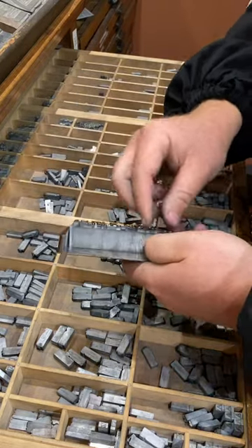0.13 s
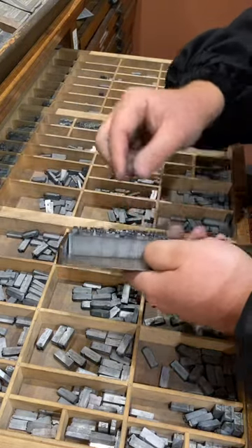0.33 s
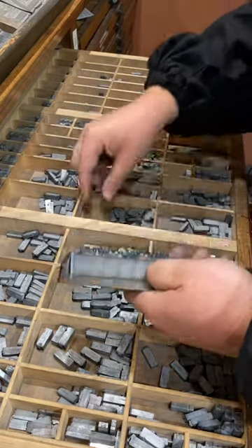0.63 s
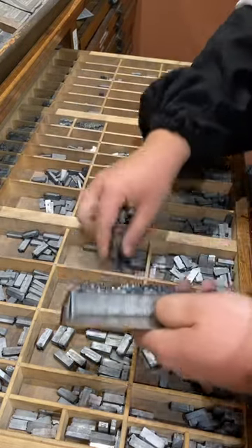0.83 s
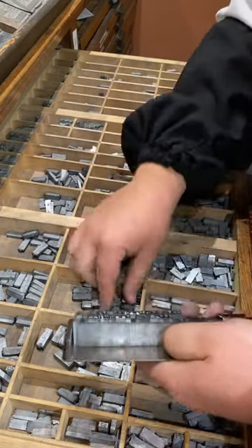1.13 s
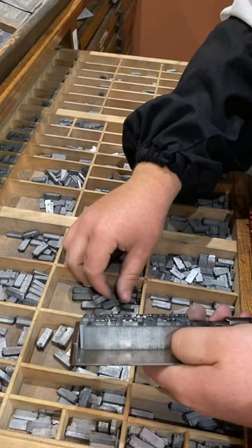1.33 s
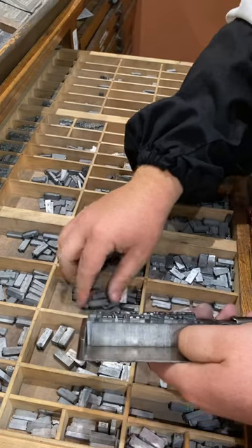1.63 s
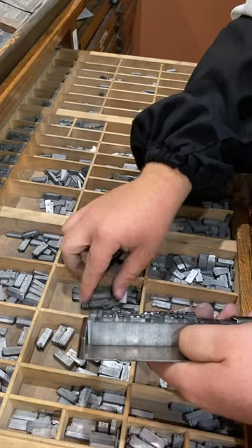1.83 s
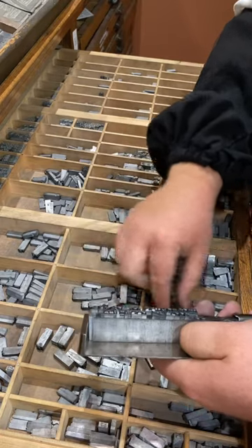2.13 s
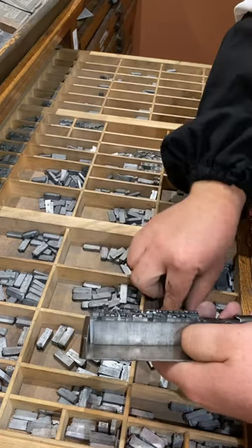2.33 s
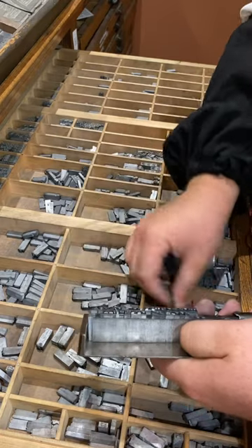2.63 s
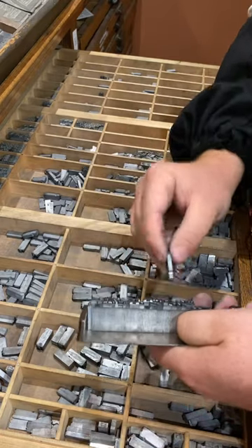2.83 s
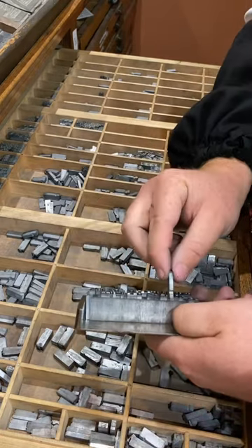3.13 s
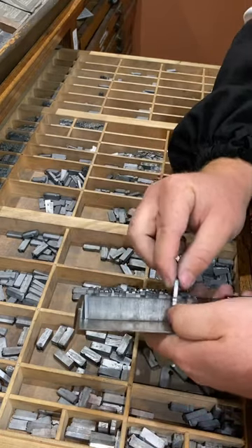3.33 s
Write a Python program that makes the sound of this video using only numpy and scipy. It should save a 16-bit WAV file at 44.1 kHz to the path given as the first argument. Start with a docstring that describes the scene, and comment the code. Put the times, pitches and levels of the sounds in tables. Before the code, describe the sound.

Small metal type pieces click against a hand-held metal holder, then knock and rattle as fingers rummage in a wooden case. One piece scrapes over wood and clicks into the holder, close up in a quiet, humming room.

```python
"""Hand typesetting, close up, in a quiet room with ventilation rumble and mains hum throughout.
First, small lead sorts click against a hand-held metal composing stick and a thumb slides along it.
From 1 s, fingers rummage in a wooden type case: pieces knock and rattle, and the tray drums softly.
Around 2.5 s a sort scrapes over the wood, and just after 3 s it clicks home in the stick.
A faint, dull room tail follows each click."""
import sys
import numpy as np
from scipy import signal
from scipy.fft import rfft, irfft, next_fast_len
from scipy.io import wavfile

SR = 44100
rng = np.random.default_rng(int(sys.argv[2]) if len(sys.argv) > 2 else 0)


def store_pcm(level_fs):
    """Save levels as 16-bit WAV."""
    pcm = np.round(np.clip(level_fs, -1, 1) * 32767).astype(np.int16)
    wavfile.write(sys.argv[1], SR, np.atleast_2d(pcm).T)


N = 153468

# Ventilation, deep rumble under faint hiss. Each row: frequency in Hz, gain in dB.
VENTILATION_EQ = [(8.8, -34), (15, 9), (29, -5), (60, -14.5), (76, -23.5), (124, -14.5), (147, -24.5),
                  (278, -23), (643, -35), (787, -38.5), (1250, -44.5), (1670, -46), (5150, -58),
                  (7080, -57.5), (15000, -64.5)]

# The tray drumming under the fingers. Each row: middle and half length in seconds, level in dB.
TRAY_SWELLS = [(1.39, 0.099, -44), (1.67, 0.021, -44)]
# Pieces shifting in the case. Each row: middle and half length in seconds, level in dB.
RATTLE_SWELLS = [(1.048, 0.0024, -25), (1.095, 0.065, -53.5), (1.25, 0.036, -38.5), (1.33, 0.1, -43),
                 (1.445, 0.014, -38)]
# A sort dragged over the wood. Each row: middle and half length in seconds, level in dB, pitch in Hz.
SCRAPE_STROKES = [(2.348, 0.052, -54, 4450), (2.452, 0.035, -46.5, 1650), (2.536, 0.015, -46.5, 2070),
                  (2.568, 0.023, -44.5, 5200), (2.613, 0.015, -28.5, 1660), (2.644, 0.011, -40.5, 1890)]
# The tone of lead scraping wood. Each row: frequency in Hz, gain in dB.
SCRAPE_EQ = [(300, -16), (700, -23), (1100, 2.5), (1400, -3.5), (1690, 5.5), (1900, -2), (2200, 0.5),
             (3000, -5), (5200, -9), (6000, -14), (9000, -23.5), (15000, -35)]
# Sorts knocking in the case. Each row: start in seconds, level in dB, treble in dB, pitch in Hz.
KNOCKS = [(1.0435, -28.5, 8, 7000), (1.0511, -12.5, 3, 1850), (1.0523, -10, 11, 3760),
          (1.071, -33, -8, 2900), (1.1194, -16.5, 6, 5440), (1.1736, -22.5, 0, 1750),
          (1.2348, -26.5, 11, 3670), (1.2455, -22.5, -7, 4040), (1.2541, -30, -1, 4600),
          (1.265, -19.5, -4, 4100), (1.2713, -29.5, -1, 2500), (1.2765, -30, -10, 3910),
          (1.286, -15, 3.5, 2970), (1.2907, -35, -2, 2600), (1.302, -29.5, -10, 2220),
          (1.3193, -26, 6, 2040), (1.3354, -25, -14, 3800), (1.3461, -24, -2, 3680),
          (1.379, -22.5, -14, 1950), (1.4174, -13.5, 1.5, 2010), (1.4232, -12.5, 3, 2070),
          (1.4257, -19.5, 4, 2020), (1.436, -25, -1, 2150), (1.4451, -27, -10.5, 2180),
          (1.4742, -24.5, 0.5, 3660), (1.538, -36, -9, 3730), (1.5853, -34.5, 2, 4500),
          (1.624, -41.5, -4.5, 3680), (1.6631, -29.5, -2.5, 2730), (1.9112, -43.5, -0.5, 2858),
          (1.9272, -42, -0.5, 2370), (2.3169, -40.5, -4, 1650), (2.5627, -30, -12, 1750),
          (2.594, -30, -21, 1650), (2.608, -32, -6, 1650), (2.619, -32, -5, 1720)]
# The ring of the loaded case. Each row: frequency in Hz, resonance height in dB, T60 in seconds.
CASE_RESONANCES = [(382, -8, 0.1), (449, -4, .08), (888, 3, 0.031), (1090, 0.5, 0.035), (1261, 0, 0.039),
                   (1660, -7.5, 0.064), (2040, -4, 0.034), (2203, 3.5, 0.026), (2950, -5.5, 0.02),
                   (3570, -7, 0.02), (3836, -4, 0.012), (4930, -8, 0.018), (6260, -14, 0.0089),
                   (7050, -19, 0.016)]
# The woody attack of a knock. Each row: frequency in Hz, gain in dB.
CASE_CRACK_EQ = [(150, -29.5), (600, -12), (900, 6.5), (1500, 4.5), (2200, 6.5), (4000, 3), (6000, -4.5),
                 (8000, -16), (10000, -30), (16000, -41)]

# The thumb sliding along the stick. Each row: middle and half length in seconds, level in dB.
RUB_SWELLS = [(.5, 0.082, -56), (.78, 0.16, -62), (3.062, 0.0037, -41.5), (3.4, 0.047, -57)]
# The tone of skin on metal. Each row: frequency in Hz, gain in dB.
RUB_EQ = [(500, -10.5), (1760, 2.5), (4000, -0.5), (5400, -5.5), (5780, 1), (6200, -4.5), (7500, -8.5),
          (8000, -4.5), (9000, -15.5), (15000, -23.5)]
# Sorts set against the stick. Each row: start in seconds, level in dB, treble in dB, pitch in Hz.
CLICKS = [(.0087, -13.5, -3, 2930), (0.1172, -15.5, -4, 5700), (0.1363, -32.5, 3, 2000),
          (0.14, -35, -6, 8100), (3.0555, -42, -2, 3000), (3.0682, -12.5, -2, 2410),
          (3.3602, -16.5, -8.5, 2910), (3.4293, -38, -13.5, 2600), (3.4699, -34, -4.5, 2550)]
# The stick with a sort against it. Each row: frequency in Hz, resonance height in dB, T60 in seconds.
STICK_RESONANCES = [(1061, 2, 0.018), (1733, -3.5, 0.04), (1760, -10, 0.3), (2723, -3.5, 0.0061),
                    (3320, -4.5, 0.011), (3400, -11.5, 0.33), (5790, -20, 0.35), (4060, -9.5, 0.006),
                    (4680, -1, 0.0056), (5470, -6.5, 0.011), (6800, -9, .012), (7960, -10, 0.04),
                    (10720, -16.5, 0.02)]
# The bright attack of a click. Each row: frequency in Hz, gain in dB.
STICK_CRACK_EQ = [(200, -26.5), (700, -36.5), (1450, -18), (1900, -4.5), (3200, -1.5), (5500, -4.5),
                  (8000, -5), (11000, -28), (16000, -27)]

RATTLE_GRAINS_PER_S, FRICTION_GRAINS_PER_S, GRAIN_SPREAD_DB = 350, 3500, 2.5
BASS_HZ, TREBLE_HZ = 1403, 6000  # shelf corners for each contact
BASS_DB_PER_OCTAVE, MIDDLE_PIECE_HZ, MAX_BASS_DB = 5.5, 2470, 4.5
STICK_SEND_DB, CASE_SEND_DB = -30, -22


def undb(db):
    """Decibels to gain."""
    return 10 ** (np.asarray(db) / 20)


def unit_rms(x):
    """Scale to rms 1."""
    return x / np.sqrt(np.mean(x ** 2))


def unit_energy(x):
    """Scale to energy 1."""
    return x / np.sqrt(np.sum(x ** 2))


def butter(x, hz, kind):
    """Gentle low-, high- or band-pass."""
    return signal.sosfilt(signal.butter(2, hz, kind, fs=SR, output="sos"), x)


def eq(x, points):
    """Minimum-phase EQ through (Hz, dB) points, so nothing rings ahead of an attack."""
    size = 2 * next_fast_len(len(x))
    hz, db = np.array(points, float).T
    bins_hz = np.maximum(np.fft.rfftfreq(size, 1 / SR), 1)
    gain = undb(np.interp(np.log(bins_hz), np.log(hz), db))
    cepstrum = irfft(np.log(gain))
    cepstrum[1:size // 2] *= 2
    cepstrum[size // 2 + 1:] = 0
    return irfft(rfft(x, size) * np.exp(rfft(cepstrum)), size)[:len(x)]


def decay(t, t60):
    """Exponential decay, 60 dB down at t60."""
    return np.exp(-np.log(1000) * t / t60)


def add(out, x, start):
    """Mix x into out from a time in seconds."""
    i = int(start * SR)
    out[i:i + len(x)] += x[:max(len(out) - i, 0)]


def swells(rows):
    """A bell-shaped envelope for each movement of the fingers."""
    t = np.arange(N) / SR
    return sum(undb(db) * np.exp(-((t - middle) / half) ** 2) for middle, half, db in rows)


def grains(per_s):
    """Tiny contacts at random moments, of uneven size."""
    hits = rng.random(N) < per_s / SR
    sizes = undb(GRAIN_SPREAD_DB * rng.standard_normal(N))
    return hits * sizes * rng.choice([-1, 1], N)


def room_tone(air_db=-32, hum_hz=118.7, hum_db=-62):
    """The bed: ventilation rumble with faint hiss, and mains hum."""
    air = eq(rng.standard_normal(N + SR), VENTILATION_EQ)[SR:]
    hum = np.sqrt(2) * np.sin(2 * np.pi * hum_hz * np.arange(N) / SR)
    return undb(air_db) * unit_rms(air) + undb(hum_db) * hum


def room_tail(send, low_t60=0.58, high_t60=0.28, split_hz=4000, build_s=0.046, top_hz=7200):
    """A diffuse, dull reverb whose treble dies first."""
    t = np.arange(SR) / SR
    low = butter(rng.standard_normal(SR), split_hz, "low") * decay(t, low_t60)
    high = butter(rng.standard_normal(SR), split_hz, "high") * decay(t, high_t60)
    tail = unit_energy((low + high) * (1 - np.exp(-t / build_s)))
    return signal.fftconvolve(send, butter(tail, top_hz, "low"))[:N]


def tray_drumming():
    """Fingers push the heap about, and the lowest mode of the case drums softly."""
    resonance = signal.iirpeak(CASE_RESONANCES[0][0], Q=9, fs=SR)
    drum = grains(RATTLE_GRAINS_PER_S)
    for _ in range(2):
        drum = signal.lfilter(*resonance, drum)
    return unit_rms(drum) * swells(TRAY_SWELLS)


def impact(modes, detune, spread_s, band_hz, crack_eq, crack_db, crack_t60):
    """One hit: detuned modes start up to spread_s apart and radiate in band_hz, under a noisy crack."""
    t = np.arange(int(max(t60 for _, _, t60 in modes) * SR)) / SR
    body = 0
    for hz, db, t60 in modes:
        age = np.maximum(t - spread_s * rng.random(), 0)
        detuned_hz = hz * (1 + detune * rng.standard_normal())
        body = body + undb(db) / t60 * decay(age, t60) * np.sin(2 * np.pi * detuned_hz * age)
    body = butter(body, band_hz, "band")
    crack = eq(rng.standard_normal(len(t)) * decay(t, crack_t60), crack_eq)
    return unit_energy(body) + undb(crack_db) * unit_energy(crack)


def sort_ring(x, hz, ring_db):
    """The sort itself adds a resonance at its own pitch."""
    return x + undb(ring_db) * signal.lfilter(*signal.iirpeak(hz, Q=7, fs=SR), x)


def contact(x, db, bass_db=0, treble_db=0):
    """Give a contact its weight and hardness, and the energy of 5 ms of sound at db."""
    shelves = [(BASS_HZ / 2, bass_db), (BASS_HZ, bass_db), (2 * BASS_HZ, 0), (TREBLE_HZ, treble_db)]
    return unit_energy(eq(x, shelves)) * np.sqrt(0.005 * SR) * undb(db)


def edge_tick(t60=0.013, low_hz=8000):
    """The short, bright snap of hard edges meeting."""
    t = np.arange(int(t60 * SR)) / SR
    return butter(rng.standard_normal(len(t)) * decay(t, t60), low_hz, "high")


def case_impact():
    """Lead on lead and wood: the blow spreads through the pile."""
    return impact(CASE_RESONANCES, detune=0.0051, spread_s=0.000961, band_hz=(310, 6740),
                  crack_eq=CASE_CRACK_EQ, crack_db=0.5, crack_t60=0.013)


def case_rattle():
    """Pieces shift under the fingers, and each tiny hit rings the case."""
    rattle = signal.fftconvolve(grains(RATTLE_GRAINS_PER_S), case_impact())[:N]
    return unit_rms(rattle) * swells(RATTLE_SWELLS)


def case_scrapes():
    """A sort drags over the wooden floor: gritty friction with a pitch for each stroke."""
    friction = eq(grains(FRICTION_GRAINS_PER_S), SCRAPE_EQ)
    return sum(unit_rms(sort_ring(friction, hz, ring_db=2.5)) * swells([(middle, half, db)])
               for middle, half, db, hz in SCRAPE_STROKES)


def type_case():
    """Sorts rattle, scrape and knock together; returns the direct sound and a broader room send."""
    direct = case_rattle() + case_scrapes()
    send = direct.copy()
    for start, db, treble_db, hz in KNOCKS:
        blow = case_impact()
        # Heavier, lower pieces draw more bass from the wood.
        bass_db = min(BASS_DB_PER_OCTAVE * np.log2(MIDDLE_PIECE_HZ / hz), MAX_BASS_DB)
        knock = sort_ring(blow, hz, ring_db=6)
        add(direct, contact(knock, db, bass_db, treble_db), start)
        add(direct, contact(edge_tick(), db - 37), start)
        crack = eq(signal.unit_impulse(len(blow)), CASE_CRACK_EQ)
        add(send, contact(blow + 2 * unit_energy(crack), db, treble_db=treble_db), start)
    return direct, send


def thumb_rub():
    """The thumb slides along the metal with a fine-grained whisper."""
    return unit_rms(eq(grains(FRICTION_GRAINS_PER_S), RUB_EQ)) * swells(RUB_SWELLS)


def stick_impact():
    """Metal on metal: all modes start at once."""
    return impact(STICK_RESONANCES, detune=0.0031, spread_s=0, band_hz=(1985, 9550),
                  crack_eq=STICK_CRACK_EQ, crack_db=-1.5, crack_t60=0.017)


def composing_stick():
    """The thumb rubs and sorts click home; returns the direct sound and a broader room send."""
    direct = thumb_rub()
    send = direct.copy()
    for start, db, treble_db, hz in CLICKS:
        click = sort_ring(stick_impact(), hz, ring_db=0)
        add(direct, contact(click, db, treble_db=treble_db), start)
        crack = eq(signal.unit_impulse(len(click)), STICK_CRACK_EQ)
        add(send, contact(crack, db, treble_db=treble_db), start)
    return direct, send


def scene():
    """The mono mix: the stick close and nearly dry, the case a little farther off and wetter."""
    bed = room_tone()
    stick, stick_send = composing_stick()
    case, case_send = type_case()
    send = undb(STICK_SEND_DB) * stick_send + undb(CASE_SEND_DB) * case_send
    return (bed + stick + case + tray_drumming() + room_tail(send))[None]


def record(dry):
    """The sharpest peaks clip at full scale, then a steep low-pass cuts the top."""
    top_cut = signal.ellip(8, 0.2, 70, 15700, fs=SR, output="sos")
    return signal.sosfilt(top_cut, np.clip(dry, -1, 1))


dry = scene()
out = record(dry)
store_pcm(out)
```